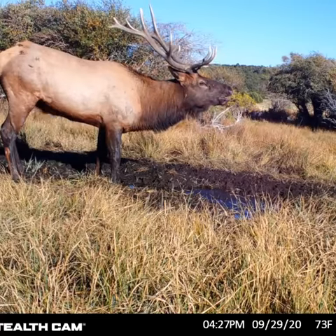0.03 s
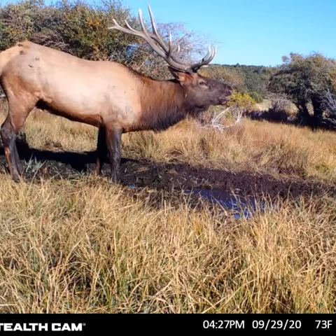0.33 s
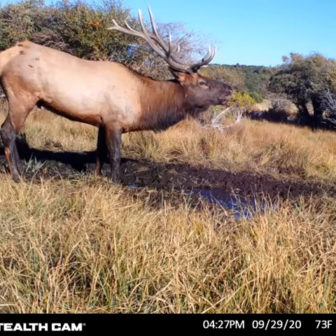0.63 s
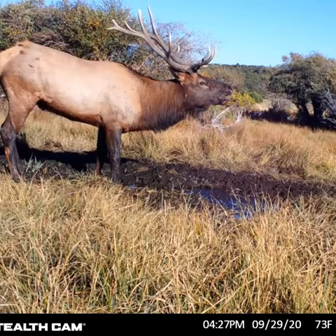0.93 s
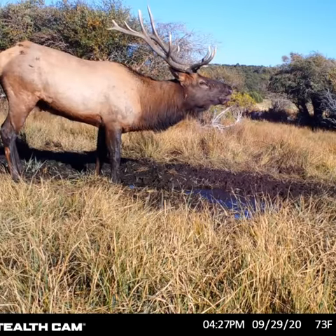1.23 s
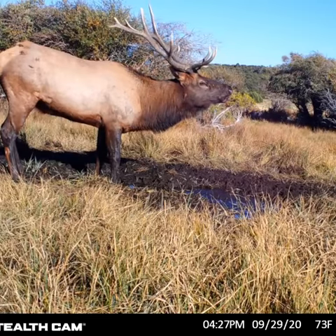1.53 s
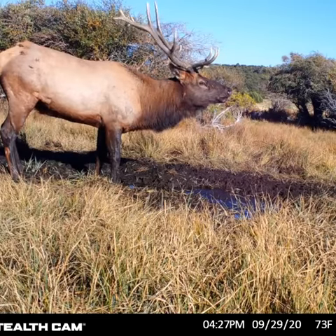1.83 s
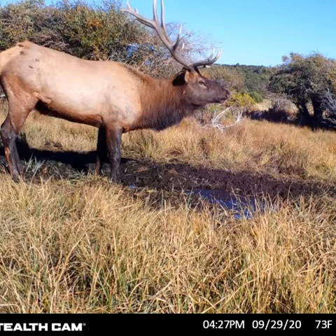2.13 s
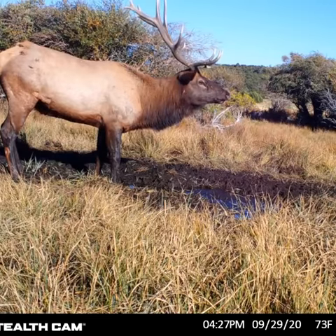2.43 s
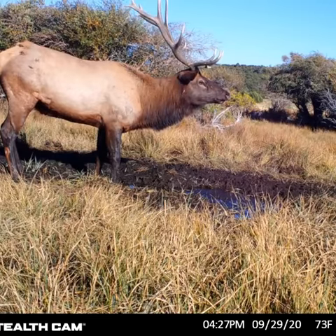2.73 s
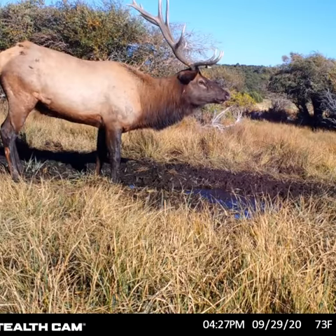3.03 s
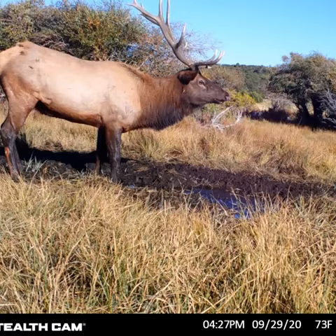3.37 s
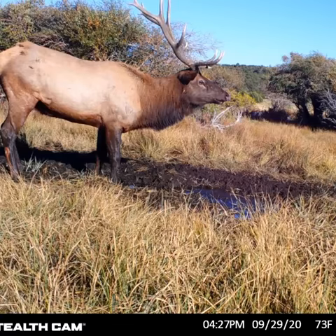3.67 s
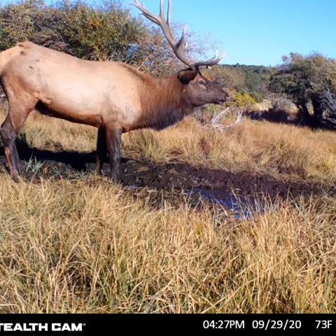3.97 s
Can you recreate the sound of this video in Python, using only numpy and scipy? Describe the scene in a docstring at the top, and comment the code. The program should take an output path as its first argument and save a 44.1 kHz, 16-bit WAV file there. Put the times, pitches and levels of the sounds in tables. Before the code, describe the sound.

Close elk bugle, shrill and rough, ending in a low grunt, then quiet grassland.

```python
"""Open, dry grassland: a bull elk bugles close by. His high whistle beats against two neighbouring
tones while turbulence rasps in his throat. It clears for a moment, turns rough again, then drops into
a short low grunt from the vocal folds and a hoot as the throat closes. Ground, brush and far trees
scatter the call. Afterwards there is only faint air, ticks and rustle in the dry grass and light
wind on the microphone."""
import sys
import numpy as np
from scipy import signal
from scipy.fft import rfft, irfft
from scipy.io import wavfile
from scipy.ndimage import uniform_filter1d, minimum_filter1d

SR = 44100
rng = np.random.default_rng(int(sys.argv[2]) if len(sys.argv) > 2 else 0)


def file_out(sig):
    """Save sig as 16-bit WAV at sys.argv[1]."""
    # one column per channel
    cols = np.atleast_2d(sig).T
    # limit, then scale
    lim = np.clip(cols, -1, 1)
    pcm = np.round(lim * 32767).astype(np.int16)
    wavfile.write(sys.argv[1], SR, pcm)


N = 176400
TIME = np.arange(N) / SR


def from_db(db):
    """Decibels to gain."""
    return 10 ** (np.asarray(db) / 20)


def rms_one(x):
    """Scale to unit rms."""
    return x / np.sqrt(np.mean(np.abs(x) ** 2) + 1e-20)


def in_time(rows):
    """Each column of a control curve, sample by sample."""
    times_s, *columns = np.transpose(rows)
    return [np.interp(TIME, times_s, column) for column in columns]


def drift(rate_hz):
    """Random wander below the given rate, unit rms."""
    lowpass = signal.butter(2, rate_hz, fs=SR, output="sos")
    return rms_one(signal.sosfilt(lowpass, rng.standard_normal(N + SR))[SR:])


def phase_of(hz):
    """Running phase of a pitch curve."""
    return 2 * np.pi * np.cumsum(hz) / SR


def resonate(x, hz, width_hz):
    """A resonance applied twice for steep sides, unit peak gain."""
    radius = np.exp(-np.pi * width_hz / SR)
    gain = (1 - radius ** 2) / 2
    section = [gain, 0, -gain, 1, -2 * radius * np.cos(2 * np.pi * hz / SR), radius ** 2]
    return signal.sosfilt([section] * 2, x + 1e-18)


# Each row: time in seconds, relative level of the whistle in dB.
WHISTLE_ENVELOPE = [(0.0, -13), (0.056, -12.5), (0.804, -7), (1.196, -11.5), (1.214, -7.5), (1.354, -12),
                    (1.364, -18), (1.402, -8.5), (1.446, -24), (1.5, -16.5), (1.526, -29), (1.552, -10),
                    (1.566, -15), (1.58, -35)]
# Each row: time in seconds, relative level of the overtones in dB. The rasp follows it too.
TREBLE_ENVELOPE = [(0.0, -32.5), (0.178, -29), (0.186, -25), (0.664, -27.5), (0.698, -26.5), (0.872, -29),
                   (0.882, -22.5), (1.096, -25.5), (1.18, -27), (1.35, -29.5), (1.376, -34.5),
                   (1.434, -34.5), (1.46, -26.5), (1.6, -54)]
RELEASE_START_S, RELEASE_DB_PER_S = 1.575, 909


def elk(flutter_depth=.15, low_tone_db=-28):
    """The bugle: whistle, rasp and grunt shaped by the airway, then a closing hoot."""
    release_db = RELEASE_DB_PER_S * np.clip(TIME - RELEASE_START_S, 0, 1)
    level_db = in_time(WHISTLE_ENVELOPE)[0] - release_db
    treble_db = in_time(TREBLE_ENVELOPE)[0] - release_db
    tone, beats, roughness = whistle(level_db, treble_db)
    turbulence = rasp(treble_db, beats, roughness)
    low_tone, pulses = grunt()
    flutter = 1 + flutter_depth * np.tanh(low_tone)  # the low voice chops the whistle
    call = tone * flutter + from_db(low_tone_db) * low_tone + throat(turbulence, pulses)
    return airway(call) + hoot()


# Each row: time in seconds, pitch of the main tone in Hz.
MAIN_PITCH = [(0, 2350), (.06, 2317), (.095, 2422), (.125, 2294), (.43, 2295), (.49, 2334), (.55, 2337),
              (.605, 2391), (.63, 2335), (.685, 2400), (.695, 2330), (.755, 2405), (.765, 2315),
              (.81, 2395), (.84, 2335), (.875, 2400), (.89, 2318), (1.11, 2319), (1.33, 2260), (1.36, 2200),
              (1.41, 2142), (1.438, 2114), (1.452, 1905), (1.48, 1840), (1.52, 1775), (1.527, 1477),
              (1.541, 1335), (1.545, 980), (1.58, 940)]
# Each row: time in seconds, lower and upper tone in dB against the main tone, roughness from 0 to 1.
SIDE_TONES = [(0, -10, -8, 0.85), (.085, -19, -36, 0.87), (.125, -3, -1.5, 0.84), (.25, -14.5, 3, 0.85),
              (.38, -3.5, 0, 0.78), (.45, -10.5, -3.5, .9), (.54, -15.5, -35.5, 0.77),
              (.585, -9.5, -21.5, .8), (.64, -8.5, -9.5, .9), (.82, -5, -15.5, 0.77),
              (.875, -16, -16.5, 0.96), (.895, -28.5, -39, 0.17), (.96, -29, -38.5, 0.55),
              (.99, -40, -46, 0.069), (1.1, -44.5, -42, 0.2), (1.125, -5, 1, .9), (1.17, -12, -14.5, .8),
              (1.21, 7.5, 10.5, 0.73), (1.33, 5.5, 4, 0.81), (1.365, -24, -30.5, 0.56),
              (1.43, -17.5, -16, 0.64), (1.48, -30, -33, 0.87), (1.56, -27, -32, 0.4)]
LOWER_HZ, UPPER_HZ = 2149.4, 2407
MAIN_JITTER_RAD, LOWER_JITTER_RAD, UPPER_JITTER_RAD = .45, .19, .42  # at full roughness
JITTER_RATE_HZ = 110


def whistle(level_db, treble_db, wander_hz=9, shimmer_depth=.26, beat_ceiling=1.7):
    """Three unsteady tones beat together; their joint wave carries the overtones."""
    main_hz, = in_time(MAIN_PITCH)
    lower_db, upper_db, roughness = in_time(SIDE_TONES)
    tones = [(main_hz, 0, MAIN_JITTER_RAD),
             (LOWER_HZ, lower_db, LOWER_JITTER_RAD),
             (UPPER_HZ, upper_db, UPPER_JITTER_RAD)]
    wave, power = 0, 0
    for hz, db, jitter_rad in tones:
        phase = phase_of(hz + wander_hz * roughness * drift(rate_hz=25))
        phase += jitter_rad * roughness * drift(JITTER_RATE_HZ)
        wave += from_db(db) * np.exp(1j * phase)
        power += from_db(db) ** 2
    shimmer = 1 + shimmer_depth * roughness * drift(rate_hz=77)
    beats = np.abs(wave) / np.sqrt(power) * shimmer
    beats = np.tanh(beats / beat_ceiling) / np.tanh(1 / beat_ceiling)
    joint_phase = np.unwrap(np.angle(wave))
    fundamental = from_db(level_db + .5) * np.cos(joint_phase)
    treble = from_db(treble_db - 2.5) * overtones(joint_phase, roughness)
    return np.sqrt(2) * beats * (fundamental + treble), beats, roughness


# Each row: multiple of the pitch, relative level in dB when clear, the same when rough.
OVERTONE_MIX = [(.5, -28.5, -47), (1.5, -32.5, -47.5), (2, -19, -25.5), (2.5, -28, -39.5), (3, -36, -16.5),
                (3.5, -40.5, -41.5), (4, -51, -26.5), (4.5, -36.5, -51.5), (5, -45, -41.5)]


def overtones(phase, roughness, jitter_rad=.15):
    """Whole and half multiples of the whistle, with the joint power of one unit sine."""
    wave, power = 0, 0
    for multiple, clear_db, rough_db in OVERTONE_MIX:
        gain = from_db(clear_db + (rough_db - clear_db) * roughness)
        wave += gain * np.cos(multiple * phase + jitter_rad * roughness * drift(JITTER_RATE_HZ))
        power += gain ** 2
    return wave / np.sqrt(power)


def rasp(treble_db, beats, roughness, gain_db=3, follow_share=.5, pulsed_share=.4):
    """Turbulence in the throat, pulsing with the beats and fading when the whistle clears."""
    effort_db = gain_db + follow_share * (treble_db - treble_db.max())
    pulsing = 1 - pulsed_share + pulsed_share * beats
    return rng.standard_normal(N) * pulsing * roughness * from_db(effort_db)


# Each row: time in seconds, pitch in Hz, relative level in dB.
GRUNT_CONTOUR = [(1.25, 170, -38), (1.33, 172, -16.5), (1.38, 182, -3), (1.44, 187.5, 0.5), (1.5, 183, -7),
                 (1.53, 172, 2.5), (1.555, 150, 2.5), (1.585, 129.4, -7), (1.61, 105, -12),
                 (1.66, 90, -23.5)]


def grunt(pitch_jitter=.035, noise_share=.6):
    """The vocal folds: a low tone, and uneven pulses with a puff of noise in each cycle."""
    pitch_hz, db = in_time(GRUNT_CONTOUR)
    gain = from_db(db) * (TIME > GRUNT_CONTOUR[0][0]) * (TIME < GRUNT_CONTOUR[-1][0])
    phase = phase_of(pitch_hz * (1 + pitch_jitter * drift(rate_hz=90)))
    cycle_count = np.floor(phase / (2 * np.pi))
    pulses = rms_one(np.diff(cycle_count, prepend=0))
    puffs = rms_one(rng.standard_normal(N) * (1 + np.cos(phase)))
    breathy_pulses = np.sqrt(1 - noise_share) * pulses + np.sqrt(noise_share) * puffs
    return gain * np.cos(phase), gain * breathy_pulses


# Each row: centre in Hz, width in Hz, relative gain in dB for the rasp, the same for the grunt.
THROAT_RESONANCES = [(179, 41, -72, -60), (317.7, 66, -73.5, -56), (555, 65, -81, -56.5),
                     (744.4, 130, -76, -57), (990, 100, -58.5, -46), (1039.4, 58, -56, -62),
                     (1284, 44, -53.5, -55), (1442, 80, -66, -57), (1809, 46, -51, -59),
                     (1900, 140, -60, -68.5), (2371, 320, -53, -62), (2610, 150, -50.5, -57.5),
                     (3214, 67, -73.5, -63), (4000, 380, -83, -65.5), (4446, 650, -65.5, -84),
                     (5900, 500, -65, -78), (7196, 1200, -70, -84), (8610, 2200, -74.5, -84.5),
                     (11560, 900, -80.5, -82)]


def throat(turbulence, pulses):
    """Resonances of throat and mouth, driven in parallel by rasp and fold pulses."""
    voiced = 0
    for hz, width_hz, rasp_db, grunt_db in THROAT_RESONANCES:
        drive = from_db(rasp_db) * turbulence + from_db(grunt_db) * pulses
        voiced += resonate(drive, hz, width_hz)
    return np.sqrt(SR / 2) * voiced  # scales unit white noise to unit power per Hz


# Each row: centre in Hz, width in Hz, gain in dB.
AIRWAY_BANDS = [(460, 110, -11), (1194, 80, -10), (1656, 270, -39), (1777, 66, 9), (2853, 200, -38),
                (2962, 160, -26), (3420, 140, -14), (3730, 70, 7), (3790, 220, -15), (4804, 43, 14),
                (5350, 110, -10.5), (5320, 180, 8.5), (5970, 130, 6), (6200, 200, -11), (6676, 170, 11.5),
                (7230, 58, 5), (7300, 350, -1.5), (9017, 385, 7.5), (11034, 600, -4)]


def airway(call):
    """Narrow peaks and hollows of the airway in series, each in two equal stages."""
    for hz, width_hz, db in AIRWAY_BANDS:
        b, a = signal.iirpeak(hz, hz / width_hz, fs=SR)
        for _ in range(2):
            call = call + (from_db(db / 2) - 1) * signal.lfilter(b, a, call)
    return call


def hoot(start_s=1.572, start_hz=329, sag_hz_per_s=4000, db=-17.5, attack_s=.0047, t60_s=.14):
    """The whistle's lowest step as the throat closes: a tone that swells quickly, sags and dies."""
    age_s = np.clip(TIME - start_s, 0, None)
    pitch_hz = np.maximum(start_hz - sag_hz_per_s * age_s, start_hz * 2 / 3)
    envelope = np.minimum(age_s / attack_s, 1) * from_db(db - 60 * age_s / t60_s)
    return envelope * np.sin(phase_of(pitch_hz) + MAIN_JITTER_RAD * drift(JITTER_RATE_HZ))


def scatter(call, db, t60_s, delay_s=.012):
    """Diffuse reflections that die away."""
    tail = rng.standard_normal(N) * from_db(-60 * TIME / t60_s) * (TIME > delay_s)
    return from_db(db) * signal.fftconvolve(call, rms_one(tail) / np.sqrt(N))[:N]


# Each row: start in seconds, length in seconds, level in dB.
WIND_PUFFS = [(0.028, 0.12, -48.5), (.5, 0.43, -52.5), (1.054, .55, -57.5), (2.68, .08, -49),
              (2.813, 0.2, -46), (3.031, 0.052, -43.5), (3.377, 0.232, -42.5), (3.73, 0.028, -42),
              (3.807, .14, -42.5), (3.959, 0.055, -50)]


def wind(band_hz=(20, 128), edge_s=.018):
    """Puffs of wind on the microphone: low, lumpy noise."""
    gain = 0
    for start_s, length_s, db in WIND_PUFFS:
        inside_s = np.minimum(TIME - start_s, start_s + length_s - TIME)
        gain += from_db(db) * np.clip(inside_s / edge_s + .5, 0, 1)
    bandpass = signal.butter(2, band_hz, "band", fs=SR, output="sos")
    return gain * rms_one(signal.sosfilt(bandpass, drift(rate_hz=65)))


# Each row: start in seconds, centre in Hz, level in dB.
GRASS_TICKS = [(1.955, 6000, -60.5), (2.295, 4280, -54), (2.358, 4930, -53.5), (3.533, 3825, -56),
               (3.563, 8100, -51.5), (3.638, 4100, -57), (3.962, 5220, -55)]


def grass_ticks(width_hz=4600, t60_s=.029):
    """Each tick is a short burst of noise around the pitch of its dry stalk."""
    noise = rng.standard_normal(N)
    ticks = 0
    for start_s, hz, db in GRASS_TICKS:
        age_s = np.clip(TIME - start_s, 0, 1)
        envelope = (TIME > start_s) * from_db(db - 60 * age_s / t60_s)
        ticks += envelope * rms_one(resonate(noise, hz, width_hz))
    return ticks


# Each row: time in seconds, level in dB.
RUSTLE_ENVELOPE = [(2.1, -80.5), (2.3, -76), (3.2, -77.5), (3.55, -70), (4, -69)]


def rustle(flicker_db=4):
    """A light gust brushes dry blades together: a faint, flickering treble."""
    db, = in_time(RUSTLE_ENVELOPE)
    brushing = rng.standard_normal(N) * from_db(flicker_db * drift(rate_hz=120))
    return from_db(db) * rms_one(resonate(brushing, hz=8000, width_hz=7000))


# Each row: frequency in Hz, relative spectral density in dB.
AIR_SPECTRUM = [(15, -28.5), (25, -5), (79, -19.5), (269, -23), (388, -25), (918, -32), (1590, -36.5),
                (2170, -37.5), (2970, -39), (3390, -40), (12800, -44), (16700, -75.5), (22000, -120)]


def air(level_db=-54.5):
    """Steady, faint outdoor hush."""
    hz, db = np.transpose(AIR_SPECTRUM)
    bin_hz = np.arange(N // 2 + 1) * SR / N
    shape_db = np.interp(np.log(bin_hz + 1), np.log(hz), db)
    spectrum = rfft(rng.standard_normal(N)) * from_db(shape_db)
    return from_db(level_db) * rms_one(irfft(spectrum, N))


def scene():
    """The call and its reflections over the quiet grassland, in mono."""
    call = elk()
    ground_and_brush = scatter(call, db=-20, t60_s=.28)
    far_trees = scatter(call, db=-42.5, t60_s=1.4)
    return (call + ground_and_brush + far_trees + air() + wind() + grass_ticks() + rustle())[None]


def record(dry, ceiling=.93, window_s=.003, cutoff_hz=12900):
    """A fast limiter holds the loudest beats under full scale; a steep low-pass cuts the top."""
    window = int(window_s * SR)
    needed_gain = ceiling / np.maximum(np.abs(dry), ceiling)
    gain = uniform_filter1d(minimum_filter1d(needed_gain, window), window)
    lowpass = signal.ellip(10, .1, 80, cutoff_hz, fs=SR, output="sos")
    return signal.sosfilt(lowpass, gain * dry)


dry = scene()
out = record(dry)
file_out(out)
```